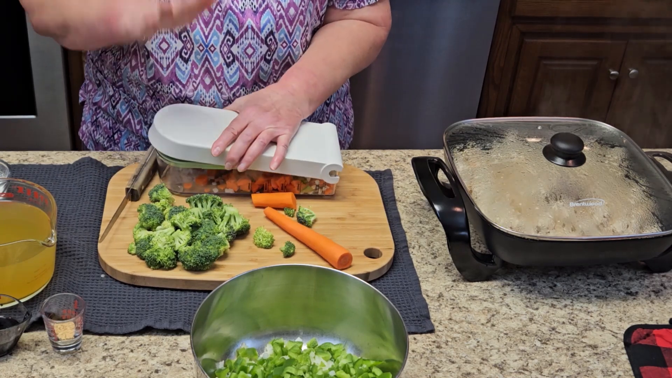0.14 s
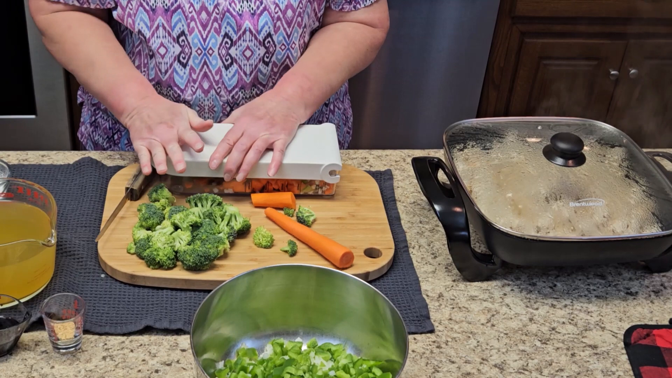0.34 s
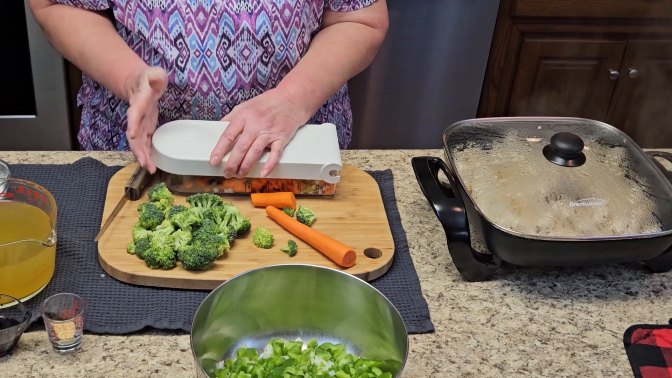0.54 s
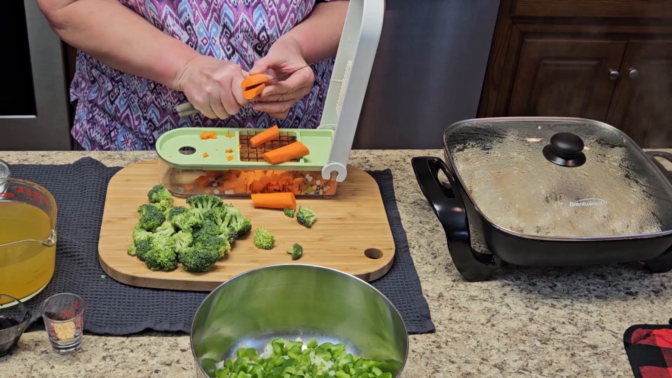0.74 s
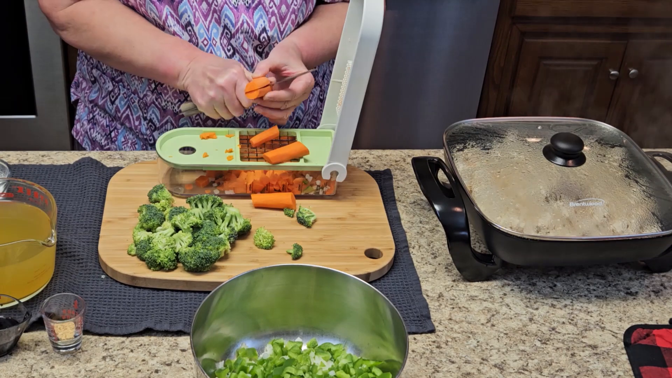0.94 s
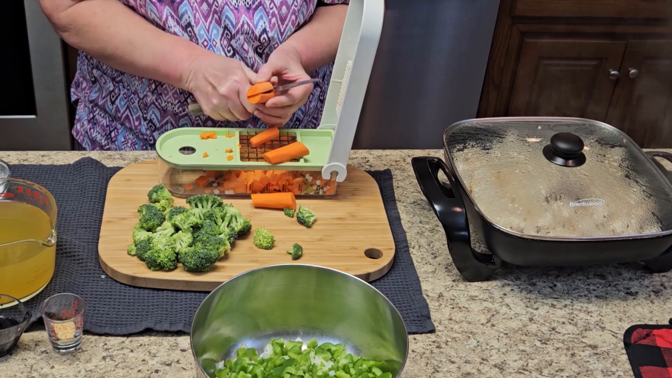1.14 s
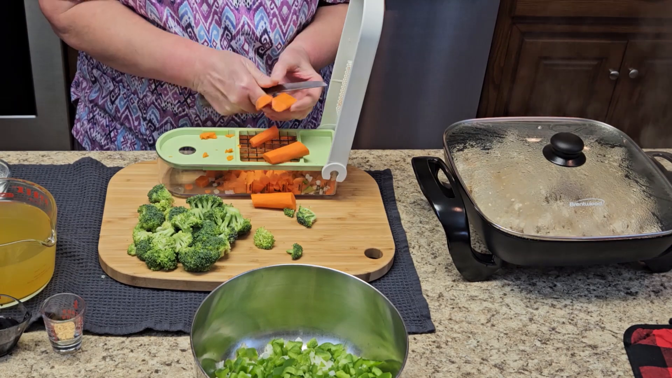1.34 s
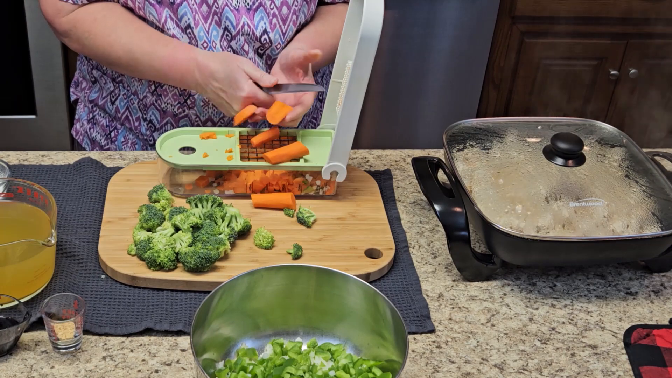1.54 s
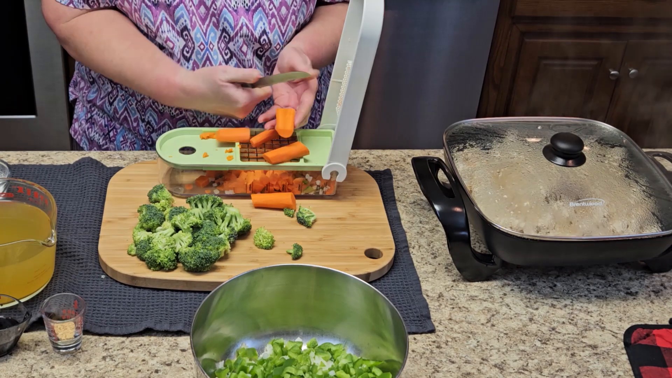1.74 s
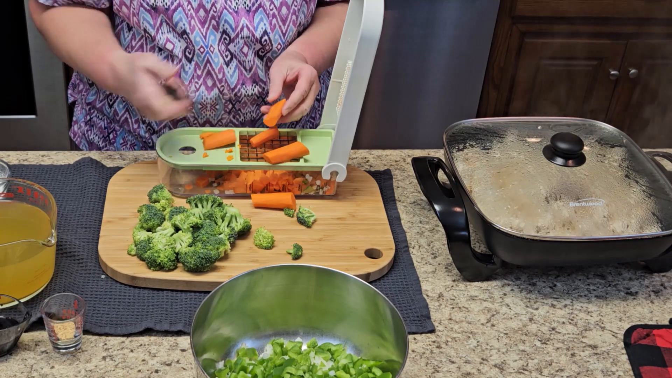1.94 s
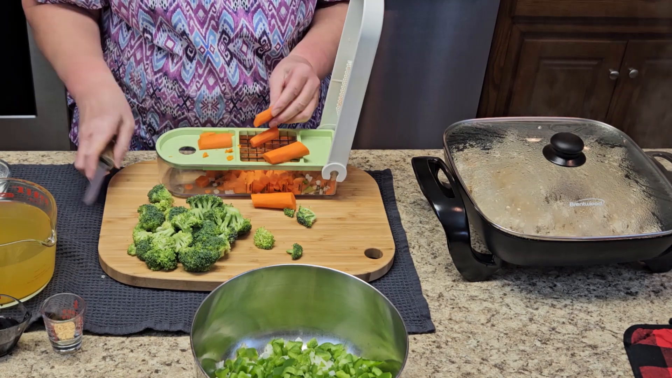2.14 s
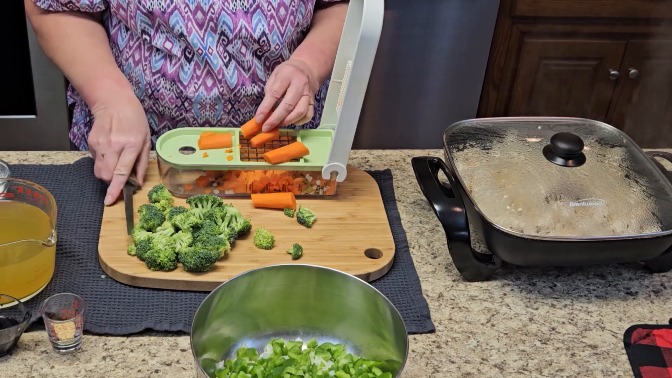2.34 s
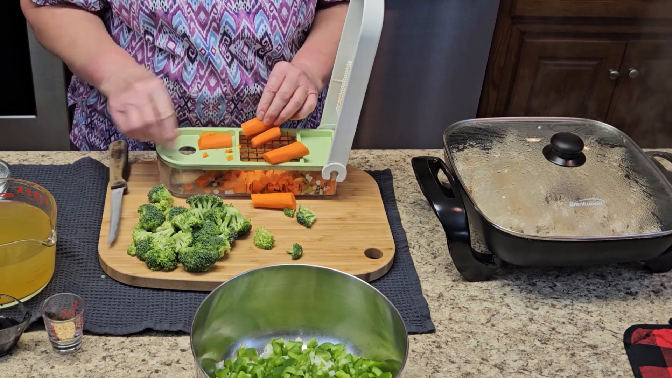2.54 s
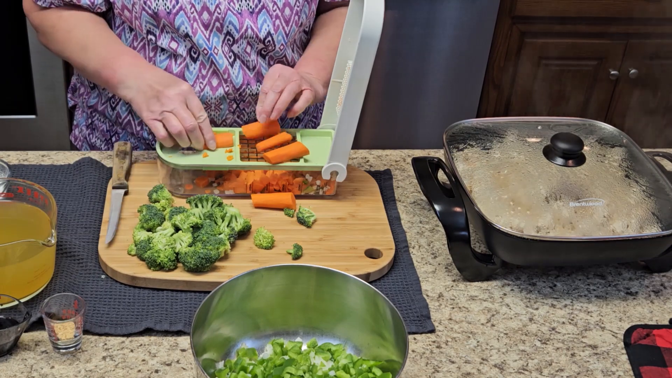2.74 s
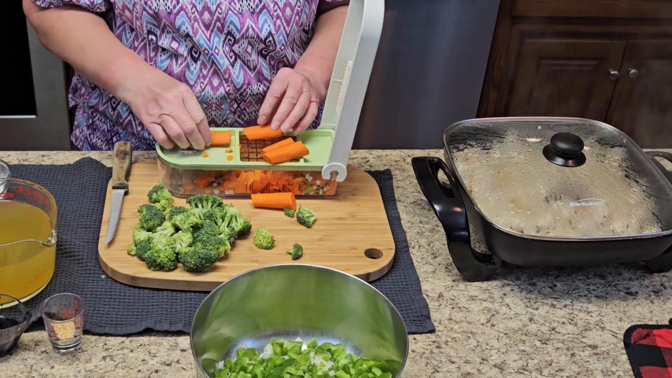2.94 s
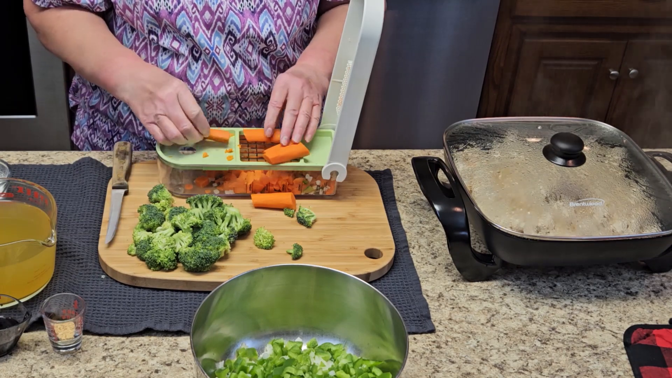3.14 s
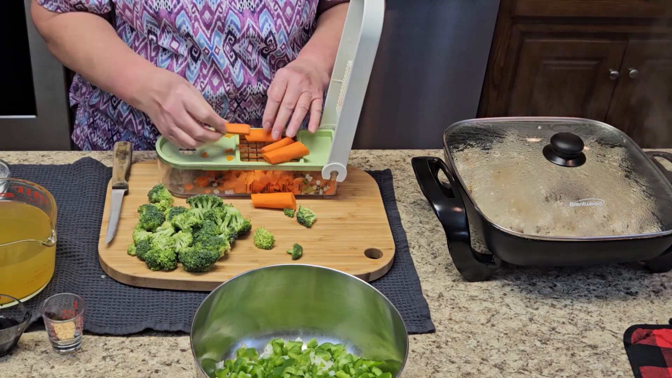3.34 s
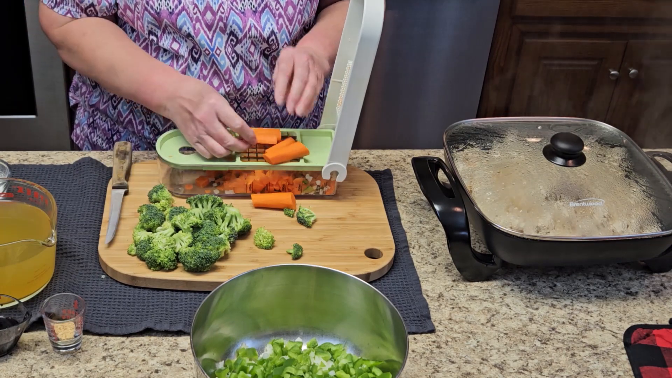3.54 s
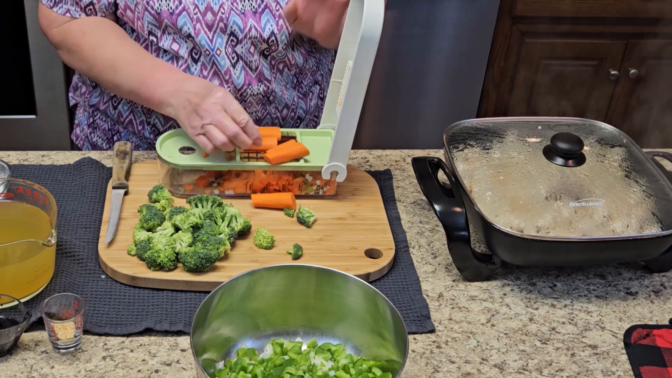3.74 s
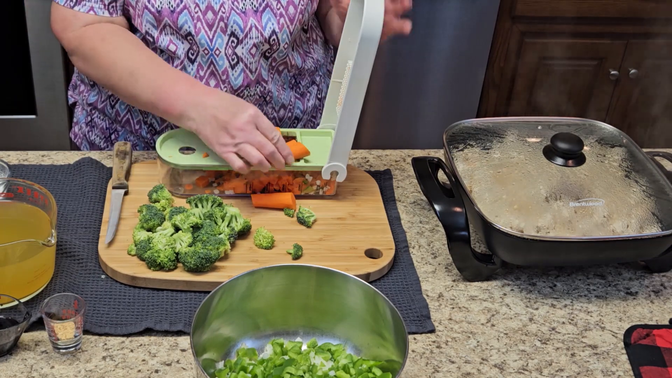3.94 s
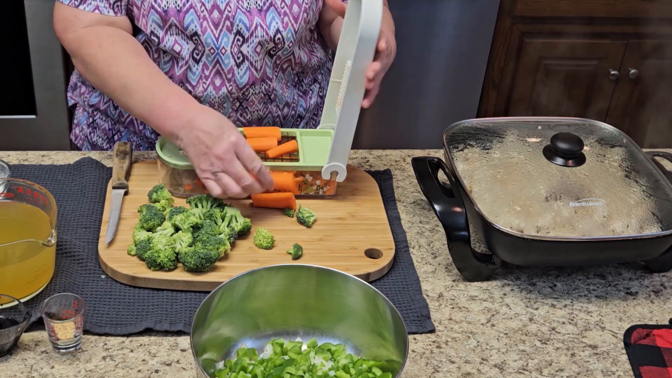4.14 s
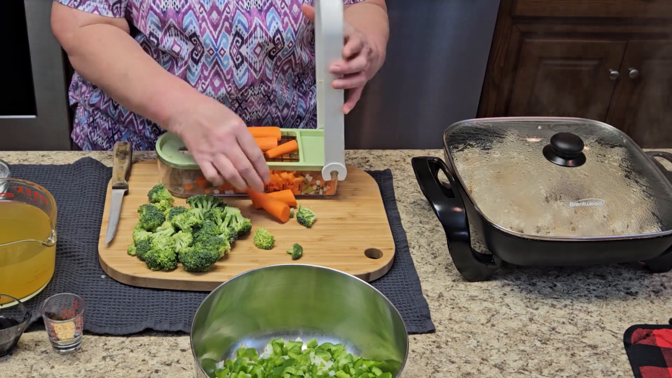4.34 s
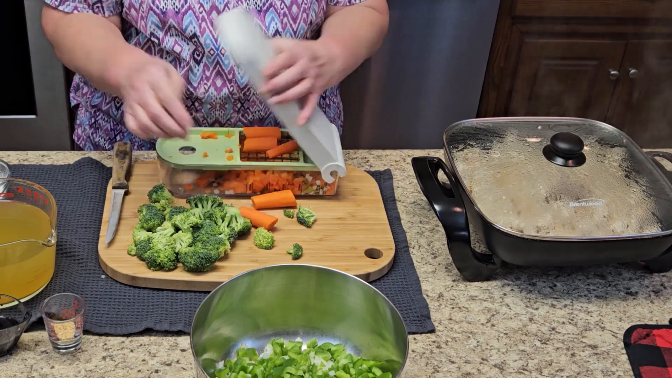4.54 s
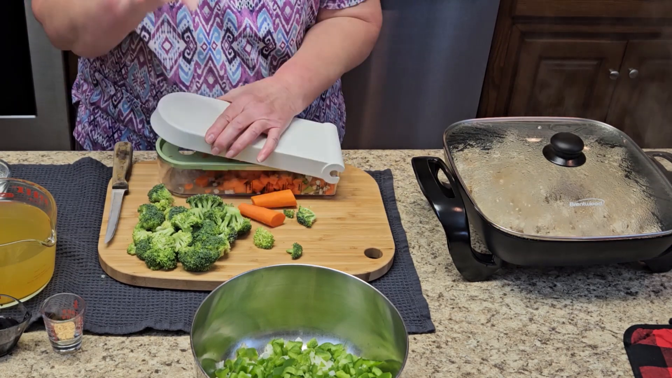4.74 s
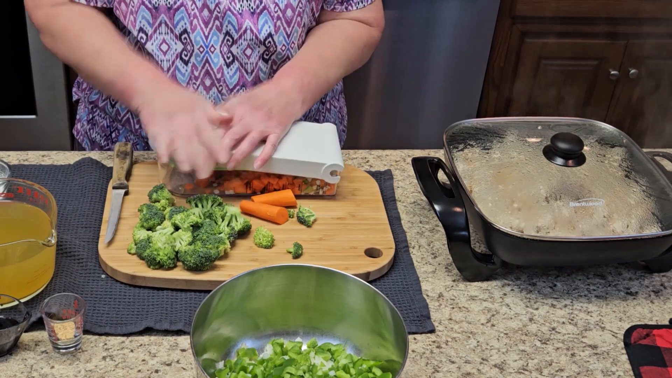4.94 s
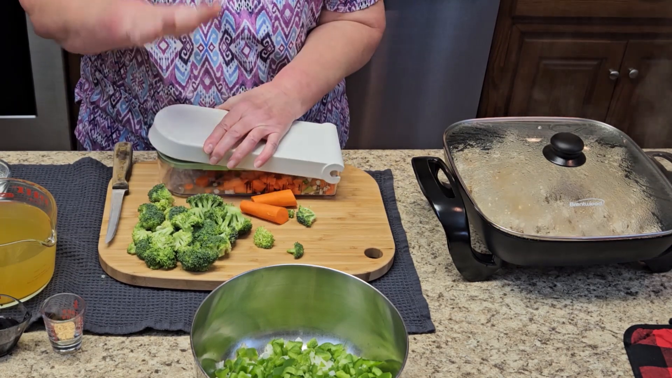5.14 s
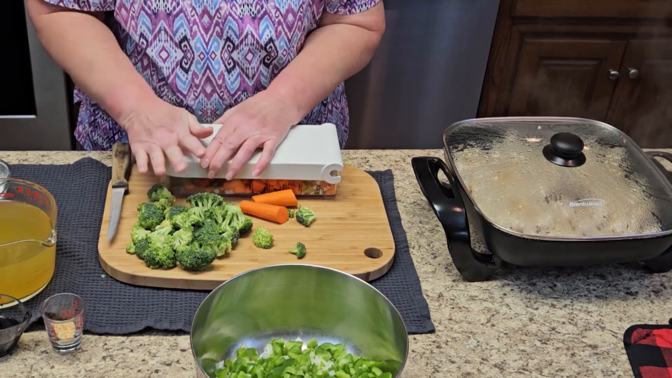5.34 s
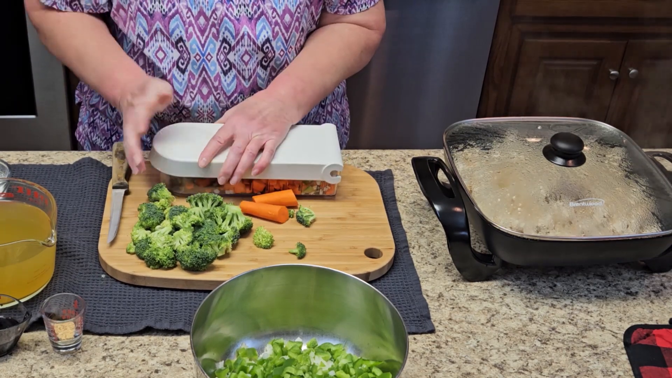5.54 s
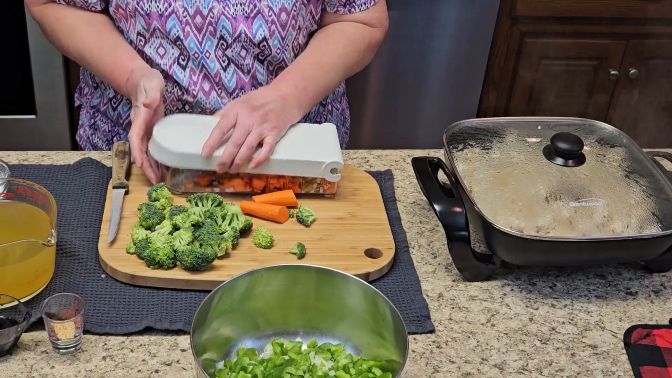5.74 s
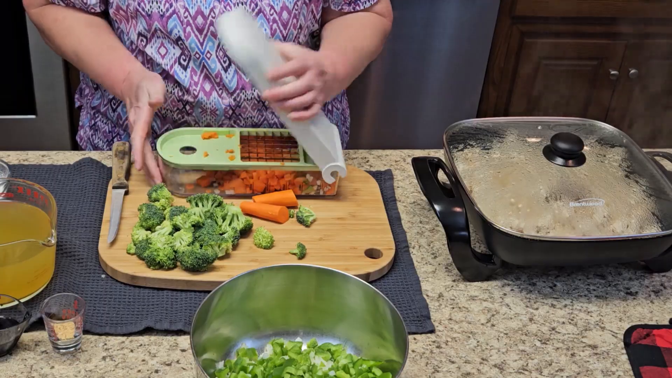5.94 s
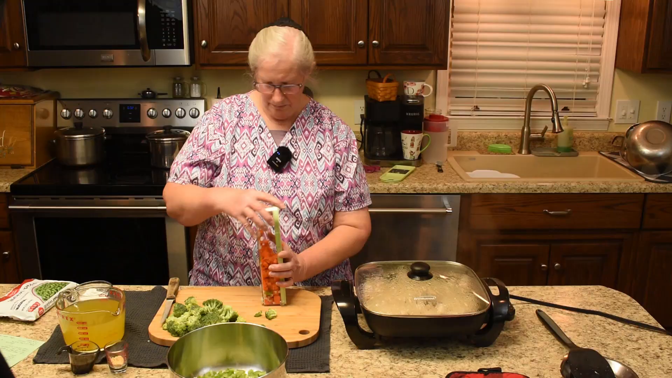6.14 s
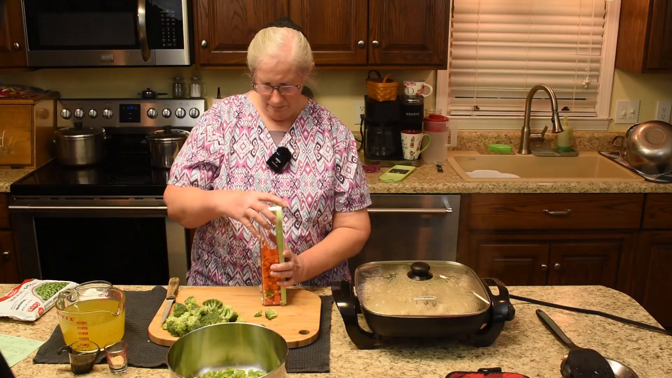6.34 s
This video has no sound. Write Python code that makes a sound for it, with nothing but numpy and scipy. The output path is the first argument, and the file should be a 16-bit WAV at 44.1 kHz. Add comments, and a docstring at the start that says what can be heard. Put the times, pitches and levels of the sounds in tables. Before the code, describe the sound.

A palm slams a plastic chopper's lid, crunching carrots, with light tray knocks and a knife clattering on wood in between.

```python
"""Dicing carrots in a lever chopper

A palm slams the lid of a plastic chopper on a wooden board. Each impact excites normal modes: the
plastic snaps, the box thumps and the counter shakes, while carrot fractures in the blade grid.
Between blows, chunks and fingers knock on the tray, a paring knife bounces on the board and sleeves
rustle by friction. A small kitchen reverberates over faint air noise and appliance hum."""
import sys
import numpy as np
from scipy import signal
from scipy.fft import rfft, irfft, next_fast_len
from scipy.io import wavfile

SR = 44100
rng = np.random.default_rng(int(sys.argv[2]) if len(sys.argv) > 2 else 0)


def generate_wav(sig):
    """Save sig (samples, or channels by samples) to the path in sys.argv[1] as 16-bit PCM at SR."""
    pcm = np.round(np.clip(np.atleast_2d(sig).T, -1, 1) * 32767).astype(np.int16)
    wavfile.write(sys.argv[1], SR, pcm)


N = 281358
TIME = np.arange(N) / SR
AGE = np.arange(int(.7 * SR)) / SR   # time since an excitation, t/s


def from_db(db):
    """The decibel is logarithmic: 20 dB is a tenfold amplitude."""
    return 10 ** (np.asarray(db) / 20)


def rms_one(x):
    """Normalisation to unit mean power."""
    return x / np.sqrt(np.mean(x ** 2) + 1e-20)


def at_hz(points, hz):
    """Interpolation on a logarithmic frequency axis."""
    f, value = np.transpose(points)
    return np.interp(np.log(np.maximum(hz, 1)), np.log(f), value)


def add(track, s, sound):
    """Superposition: a sound adds to the track from time s."""
    start = max(int(s * SR), 0)
    track[start:start + len(sound)] += sound[:N - start]


def colour(x, spectrum, size=4096):
    """Minimum-phase filtering shapes a spectrum causally and keeps the power of white noise."""
    gain = rms_one(from_db(at_hz(spectrum, np.fft.rfftfreq(size, 1 / SR))))
    cepstrum = irfft(np.log(gain))
    cepstrum[1:size // 2] *= 2
    cepstrum[size // 2 + 1:] = 0
    response = irfft(np.exp(rfft(cepstrum)))
    return signal.oaconvolve(x, response)[:len(x)]


def dull(x, hz):
    """A first-order low-pass attenuates the treble above its corner."""
    pole = np.exp(-2 * np.pi * hz / SR)
    return signal.lfilter([1 - pole], [1, -pole], x)


def resonate(x, modes):
    """Modal superposition: a body responds as damped resonators in parallel."""
    out = 0
    for hz, db, t60 in modes:
        r = from_db(-60 / (t60 * SR))   # pole radius
        feedback = [1, -2 * r * np.cos(2 * np.pi * hz / SR), r * r]
        out = out + from_db(db) * (1 - r * r) / 2 * signal.lfilter([1, 0, -1], feedback, x + 1e-18)
    return out


def boom(hz, swell_s):
    """Heavy damping: a struck body swells for a few cycles and dies."""
    envelope = (AGE / swell_s * np.exp(1 - AGE / swell_s)) ** 3
    return envelope * np.sin(2 * np.pi * hz * AGE)


def crack(envelope):
    """Random micro-contacts sum to a short burst with a nearly flat spectrum."""
    burst = rng.standard_normal(len(envelope)) * envelope
    whitened = irfft(np.exp(1j * np.angle(rfft(burst))), len(envelope))
    return rms_one(whitened * np.sqrt(envelope)) * np.sqrt(np.mean(envelope ** 2))


# The palm strikes the lid: t/s, thump level/dB, box f/Hz, snap level/dB, counter level/dB,
# crunch level/dB, crunch decay/s, crunch corner f/Hz
PALM_BLOWS = [(0.0, -31.5, 403, -40.5, -20.5, -41, 0.049, 3078),
              (0.2073, -3.5, 306, -8.5, 1.5, -16, 0.046, 7440),
              (4.628, -17.5, 553, -27, -16, -23, 0.022, 2840),
              (4.931, -11, 604, -24, -12.5, -11, 0.021, 1570), (5.265, -2, 347, -10, 0.5, -16, 0.036, 4900)]
# The lid then jams on the carrot or hits the frame: t/s, thump level/dB, box f/Hz, swell/s,
# snap level/dB, snap resonance f/Hz, crunch level/dB
LID_STOPS = [(0.046, -36.5, 409, .005, -47.5, 3520, -60.5), (0.226, -27, 280, .012, -7.5, 7800, -19),
             (4.6399, -16.5, 499.5, 0.0089, -17, 2680, -17.5), (4.939, -3, 365, 0.0095, -15, 13000, -18.5),
             (5.2896, -7, 271, 0.0056, -10, 5140, -16)]
# Spectrum of snapping plastic: f/Hz, level/dB
SNAP_SPECTRUM = [(200, -18), (800, 0.5), (2000, 0.5), (3500, 5), (5500, -4.5), (8000, 0), (12500, -2.5),
                 (16000, -11)]
# Normal modes of the box: f/Hz, level/dB, T60/s
BOX_MODES = [(248.4, -4.5, .25), (267.7, -7, 0.42), (364, -9, 0.48), (474, -26, .35), (502, -8, 0.45),
             (491, -1, 0.11), (581, -1, 0.1), (844.4, -17, 0.1), (1100, -16, .22), (1260, -9, 0.11),
             (1360, 1, .3), (1822, -2.5, 0.23), (2340, -9.5, 0.22)]
THUMP_LAG_S, CRUNCH_LAG_S = .0013, .003   # the snap leads, then the box booms and the carrot splits


def chopper(palm_swell_s=0.0053, palm_snap_hz=8000, snap_s=0.0018, ring_db=2.0, ring_t60=0.0021):
    """Impact excitation: the snap, thump and crunch of each blow and stop drive the box's modes."""
    snaps, thumps = np.zeros((2, N))
    strikes = [(s, db, hz, palm_swell_s, snap_db, palm_snap_hz) for s, db, hz, snap_db, *_ in PALM_BLOWS]
    for s, db, hz, swell_s, snap_db, snap_hz, *_ in strikes + list(LID_STOPS):
        snap = from_db(snap_db) * crack(np.exp(-AGE[:2048] / snap_s))
        add(snaps, s, snap + resonate(snap, [(snap_hz, ring_db, ring_t60)]))
        add(thumps, s + THUMP_LAG_S, from_db(db) * boom(hz, swell_s))
    clash = colour(snaps, SNAP_SPECTRUM) + crunch()
    return thumps, clash + resonate(clash + thumps, BOX_MODES)


# Spectrum of splitting carrot: f/Hz, level/dB
CRUNCH_SPECTRUM = [(60, -13), (160, -3.5), (260, 3), (600, 6.5), (1400, 3.5), (2400, -4), (4000, -6),
                   (8000, -14), (12500, -9), (16000, -34)]


def crunch(clump_db=4.5, clump_hz=130, rise_s=0.00082, stop_decay_ratio=0.93):
    """Brittle fracture: cell walls burst in uneven clumps at each blow and again as the lid stops."""
    out = np.zeros(N)
    for (blow_s, *_, blow_db, fade_s, corner_hz), (stop_s, *_, stop_db) in zip(PALM_BLOWS, LID_STOPS):
        for s, db, decay_s in (blow_s, blow_db, fade_s), (stop_s, stop_db, stop_decay_ratio * fade_s):
            bursts, clumps = rng.standard_normal((2, len(AGE)))
            clumps = np.tanh(rms_one(dull(clumps, clump_hz)))
            grains = rms_one(bursts * from_db(clump_db * clumps))
            envelope = (1 - np.exp(-AGE / rise_s)) * np.exp(-AGE / decay_s)
            add(out, s + CRUNCH_LAG_S, from_db(db) * dull(grains, corner_hz) * envelope)
    return colour(out, CRUNCH_SPECTRUM)


# Normal modes of the worktop: f/Hz, level/dB, T60/s
COUNTER_MODES = [(40.07, -14, 0.25), (54.4, -22, 0.04), (71.3, -22.5, 0.36), (105.27, -19.5, 0.53),
                 (139, -16, 0.056)]


def counter(rise_s=0.0014):
    """Free vibration: the worktop shudders after each blow, adjacent modes starting in antiphase."""
    out, shudder = np.zeros(N), 0
    for k, (hz, db, t60) in enumerate(COUNTER_MODES):
        shudder = shudder + (-1) ** k * from_db(db - 60 * AGE / t60) * np.sin(2 * np.pi * hz * AGE)
    for s, _, _, _, db, *_ in PALM_BLOWS:
        add(out, s + THUMP_LAG_S, from_db(db) * shudder * (1 - np.exp(-AGE / rise_s)))
    return out


# Likeness of left and right in diffuse sound: f/Hz, correlation coefficient
FIELD_CORRELATION = [(100, 1), (300, 0.89), (600, 0.57), (1200, 0.048), (2500, 0.05), (12000, 0.29)]


def diffuse_noise(size):
    """A diffuse field is coherent between two points in the bass and barely so in the treble."""
    alike = np.clip(at_hz(FIELD_CORRELATION, np.fft.rfftfreq(size, 1 / SR)), 0, 1)
    mid, side = rfft(rng.standard_normal((2, size)))
    mid, side = mid * np.sqrt((1 + alike) / 2), side * np.sqrt((1 - alike) / 2)
    return irfft([mid + side, mid - side], size)


# Spectrum of the air noise: f/Hz, level/dB
AIR_SPECTRUM = [(25, -21.5), (58, 1.5), (90, -5.5), (160, -8.5), (280, -3.5), (500, -12), (900, -19),
                (1800, -26.5), (3500, -30.5), (6000, -35.5), (8000, -28.5), (12500, -31), (16000, -36)]
# Tones of kitchen appliances: f/Hz, level/dB
HUM_TONES = [(59, -61), (164, -65.5)]


def air_and_hum(air_db=-54.5):
    """Stationary noise: the air has a continuous spectrum, the appliances a line spectrum."""
    noise = diffuse_noise(next_fast_len(N))[:, :N]
    air = np.array([colour(side, AIR_SPECTRUM) for side in noise])
    hum = sum(from_db(db) * np.sqrt(2) * np.sin(2 * np.pi * hz * TIME) for hz, db in HUM_TONES)
    return from_db(air_db) * air + hum


# Sleeves and hands brush: centre t/s, level/dB, Gaussian half-width/s
SLEEVE_BRUSHES = [(0.01, -69, 0.047), (0.524, -63, 0.034), (0.714, -54.5, 0.033), (0.773, -47.5, 0.0066),
                  (4.15, -62.5, 0.16), (5.25, -63.5, 0.56), (5.834, -51.5, 0.011)]
# Spectrum of rubbing cloth: f/Hz, level/dB
CLOTH_SPECTRUM = [(300, -8.5), (1500, -6.5), (4000, -1), (8000, -1.5), (13000, 0), (16000, -3)]


def rustle():
    """Sliding friction of cloth radiates broadband noise in soft swells."""
    envelope = sum(from_db(db) * np.exp(-((TIME - s) / half_s) ** 2 / 2)
                   for s, db, half_s in SLEEVE_BRUSHES)
    return colour(envelope * rng.standard_normal(N), CLOTH_SPECTRUM)


def taps(contacts, click_spectrum, modes, swell_s, coupling_db, hardness):
    """Contact time limits bandwidth: longer impacts click duller. Knock and click drive the modes."""
    knocks, clicks = np.zeros((2, N))
    for s, db, hz, click_db, contact_s in contacts:
        add(knocks, s, from_db(db) * boom(hz, swell_s))
        press = AGE[:4096] / contact_s
        click = crack(np.sqrt(press) * np.exp(-press))
        add(clicks, s, from_db(db + click_db) * dull(click, hardness / contact_s))
    clicks = colour(clicks, click_spectrum)
    return knocks, clicks + resonate(from_db(coupling_db) * knocks + clicks, modes)


# Carrot chunks and fingers knock on the tray: t/s, level/dB, f/Hz, click level/dB re knock
TRAY_KNOCKS = [(0.603, -40, 294, -33), (1.627, -38, 480, -8.5), (1.688, -43, 558, -4.5),
               (1.735, -37.5, 463, -20), (1.826, -37, 604, 0), (1.874, -32, 763, -11.5),
               (1.9867, -24, 730, -5.5), (2.29, -51, 606, -1), (2.801, -35, 670, -6.5),
               (3.002, -42, 618, 1.5), (3.455, -42.5, 510, -8), (3.6433, -32.5, 535, -13.5),
               (4.1498, -39, 665, 3), (4.204, -34.5, 1305, 3), (4.251, -35, 560, -1),
               (4.4033, -27.5, 557, -11), (4.4879, -24.5, 602, -6), (5.712, -35, 309, -6.5),
               (5.851, -39.5, 279, -0.5), (6.247, -23, 682, 2.5), (6.271, -27, 670, -0.5)]
# Runs of soft ticks; the one at 4.613 s is a faint, short hiss just before the blow:
# t/s, duration/s, tick level/dB, click level/dB re knock
TICK_RUNS = [(1.749, .075, -44.5, -8.5), (1.87, .035, -41, -5.5), (3.002, .03, -53, -2),
             (4.191, .06, -44, 5.5), (4.613, .016, -53.5, 12.5), (5.858, 0.034, -47, -3.5),
             (6.22, 0.067, -40, 5)]
# Spectrum of clicks on the tray: f/Hz, level/dB
TRAY_SPECTRUM = [(100, -22), (400, 4), (800, 3), (1500, -3.5), (2300, -12.5), (4000, -15), (8000, -20),
                 (15000, -28)]
# Normal modes of the chopper's tray: f/Hz, level/dB, T60/s
TRAY_MODES = [(257, -3, .08), (352, 6.5, 0.36), (540, -0.5, .08), (790, -9.5, 0.11), (1074, -6, 0.27),
              (1210, -2, 0.093), (1480, 2.5, 0.062), (2050, 9, 0.096), (2630, -5, .08), (2970, 0.5, 0.56),
              (3530, 3, .1)]
SPOT_OCTAVES = 0.31   # a rebound lands on another spot, so its pitch scatters


def chunks_on_tray(contact_s=0.0037, scuff_s=0.0053, rebound_s=.012, ticks=5, tick_hz=571):
    """Inelastic collision: each knock rebounds softly once. Soft ticks come in short, uneven runs."""
    contacts = []
    for s, db, hz, click_db in TRAY_KNOCKS:
        timing, spot = rng.uniform(-0.978, 1, 2)
        return_s = s + rebound_s * (1 + 0.192 * timing)
        return_hz = hz * 2 ** (SPOT_OCTAVES * spot)
        contacts.append((s, db, hz, click_db, contact_s))
        contacts.append((return_s, db - 8, return_hz, click_db + 3, scuff_s))   # weaker, more of a scuff
    for s, length_s, db, click_db in TICK_RUNS:
        for k, (strength, pitch) in enumerate(rng.standard_normal((ticks, 2))):
            tick_s = s + length_s * (k + rng.random()) / ticks
            hz = tick_hz * 2 ** (0.23 * pitch)
            contacts.append((tick_s, db + 4.5 * strength, hz, click_db, scuff_s))
    return taps(contacts, TRAY_SPECTRUM, TRAY_MODES, swell_s=0.0036, coupling_db=-3.0, hardness=10)


# The knife's handle lands on the board: t/s, level/dB, f/Hz, click level/dB re knock
KNIFE_LANDINGS = [(2.3627, -11, 570, -1), (2.5198, -14, 604, 2), (2.566, -20, 610, -25),
                  (2.6277, -14.5, 619, 1)]
# Spectrum of the knife's clicks: f/Hz, level/dB
KNIFE_SPECTRUM = [(80, -14), (300, 0.5), (700, 8.5), (1000, 0), (1500, 6.5), (2100, -2), (3000, -9.5),
                  (4500, -20.5), (7000, -28.5), (15000, -27.5)]
# Normal modes of the wooden board: f/Hz, level/dB, T60/s
BOARD_MODES = [(255, 5.5, 0.092), (340, 5, 0.3), (383, 1, 0.81), (580, 1, 0.13), (670, -10, 0.27),
               (694, -20, 0.27), (1260, 0.5, 0.063), (1395, 3.5, 0.15), (1868, 6, 0.13), (2300, -25, 0.15),
               (2615, -5, 0.13), (3645, 10, 0.061)]


def knife_on_board(contact_s=0.0024, hops=2, hop_s=0.018, restitution=0.75, blade_s=0.03, blade_hz=1484):
    """Restitution below one: the handle's hops get shorter and weaker; the blade slaps down late."""
    contacts = []
    for s, db, hz, click_db in KNIFE_LANDINGS:
        blade_db = db + click_db - 17   # follows the strength of the handle's click
        contacts += [(s, db, hz, click_db, contact_s), (s + blade_s, blade_db, blade_hz, -2, contact_s)]
        for k, (timing, spot) in enumerate(rng.uniform(-1, 1, (hops, 2))):
            s = s + hop_s * restitution ** k * (1 + 0.095 * timing)
            hop_db = db - 12.5 - 11 * k
            hop_hz = hz * 0.814 * 2 ** (SPOT_OCTAVES * spot)   # a soft hop tends to sound lower
            contacts.append((s, hop_db, hop_hz, click_db - 4, contact_s))
    return taps(contacts, KNIFE_SPECTRUM, BOARD_MODES, swell_s=0.0039, coupling_db=-20.0, hardness=13.0)


def near_field(x, right_lag_samples=3, scatter_s=0.001, scatter_hz=1916):
    """Path difference delays the right side; bowls and pans scatter treble differently to each side."""
    sides = np.array([x, np.r_[np.zeros(right_lag_samples), x[:-right_lag_samples]]])
    spread = AGE[:1024] / scatter_s
    paths = np.array([crack(np.sqrt(spread) * np.exp(-spread)) for _ in sides])
    paths /= np.linalg.norm(paths, axis=1, keepdims=True)
    treble = signal.sosfilt(signal.butter(2, scatter_hz, "high", fs=SR, output="sos"), sides)
    return sides + signal.oaconvolve(treble, paths, axes=1)[:, :N]


# Reverberation time of the kitchen: f/Hz, T60/s
ROOM_T60 = [(100, 0.63), (300, 0.29), (700, 0.35), (1600, 0.34), (4000, 0.34), (8000, 0.26), (14000, 0.18)]
# Strength of the reverberation: f/Hz, level/dB re the room's input
ROOM_GAIN = [(60, 6.5), (160, 0), (330, -5.5), (600, -5), (1400, -2.5), (4000, -7.5), (8000, 1.5),
             (14000, -2)]


def kitchen(x, first_echo_s=0.0013, build_s=.003):
    """Reverberation: dense wall reflections build up, then decay exponentially, the treble first."""
    size = len(AGE)
    hz, noise = np.fft.rfftfreq(size, 1 / SR), rfft(diffuse_noise(size))
    centres, response = np.geomspace(60, 15000, 12), 0
    onset = 1 - np.exp(-np.maximum(AGE - first_echo_s, 0) / build_s)
    for centre, weights in zip(centres, np.eye(len(centres))):
        band = at_hz(np.c_[centres, weights], hz)
        decay = from_db(-60 * AGE / at_hz(ROOM_T60, centre))
        tail = irfft(noise * band, size) * onset * decay
        tail *= np.sqrt(np.mean(band ** 2)) / np.linalg.norm(tail, axis=1, keepdims=True)
        response = response + from_db(at_hz(ROOM_GAIN, centre)) * tail
    return signal.fftconvolve(x[None], response, axes=1)[:, :N]


def scene():
    """Direct and reverberant fields superpose; the light clacks feed the room most strongly."""
    thumps, clash = chopper()
    board_knocks, board_clacks = knife_on_board()
    tray_knocks, tray_clacks = chunks_on_tray()
    sources = np.array([thumps, clash, board_knocks + tray_knocks, board_clacks + tray_clacks, rustle()])
    room_sends = from_db([0.0, 0.5, 2.5, 5.0, -1.0])
    direct = near_field(sources.sum(axis=0) + counter())
    return direct + kitchen(room_sends @ sources) + air_and_hum()


# The whole sound dips briefly twice: t/s, level/dB, Gaussian half-width/s
LEVEL_DIPS = [(0.688, -29, 0.016), (6.21, -24.5, 0.0068)]
# The left side drops away at the end: t/s, level/dB
LEFT_FADE = [(6.21, 0), (6.24, -33)]


def record(dry, notch_hz=10100, notch_depth=.9, tilt_db=.5, ceiling=2.2, cutoff_hz=15950):
    """Microphone notch and a stronger right side; the whole sound dips briefly twice; peaks saturate."""
    notched = signal.lfilter(*signal.iirnotch(notch_hz, Q=2.8, fs=SR), dry)
    heard = (1 - notch_depth) * dry + notch_depth * notched
    heard = signal.sosfilt(signal.butter(2, 24, "high", fs=SR, output="sos"), heard)
    dips_db = sum(db * np.exp(-((TIME - s) / half_s) ** 2 / 2) for s, db, half_s in LEVEL_DIPS)
    left_db = np.interp(TIME, *np.transpose(LEFT_FADE))
    heard = heard * from_db([dips_db + left_db - tilt_db, dips_db + tilt_db])
    rounded = ceiling * np.tanh(heard / ceiling)
    return signal.sosfilt(signal.ellip(10, .1, 70, cutoff_hz, fs=SR, output="sos"), rounded)


dry = scene()
out = record(dry)
generate_wav(out)
```